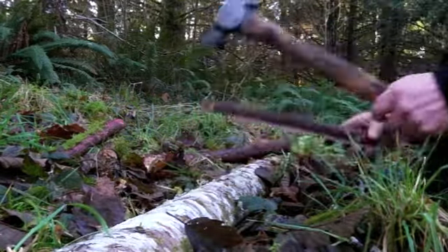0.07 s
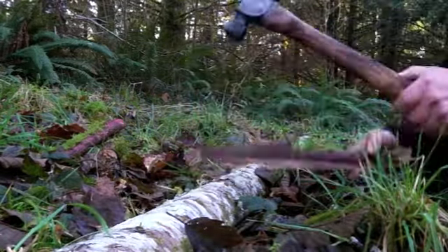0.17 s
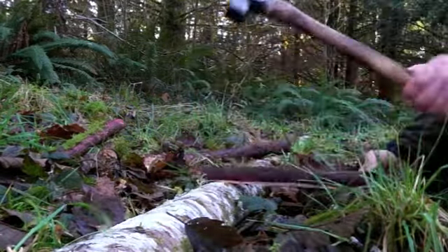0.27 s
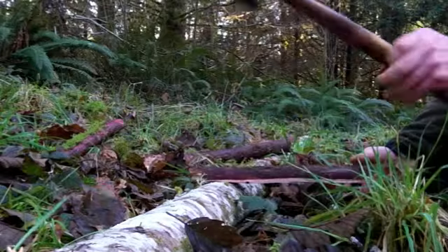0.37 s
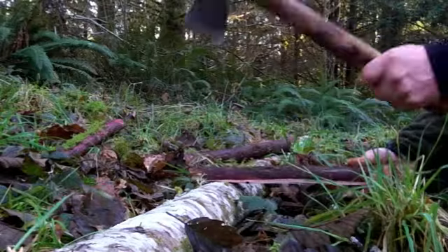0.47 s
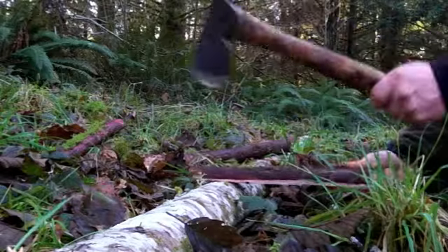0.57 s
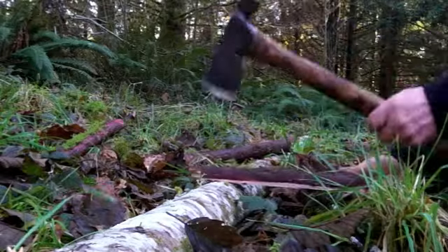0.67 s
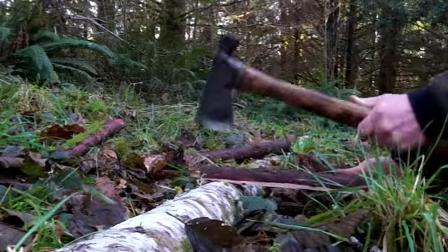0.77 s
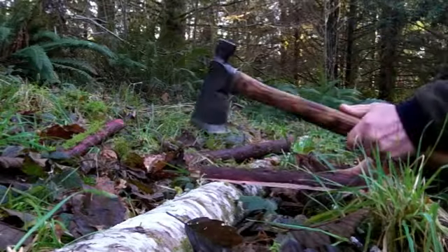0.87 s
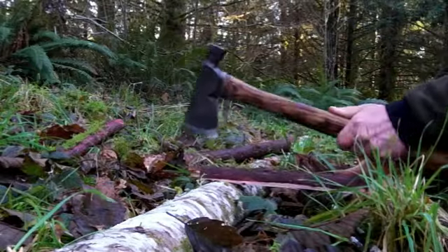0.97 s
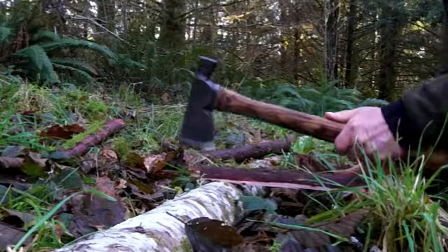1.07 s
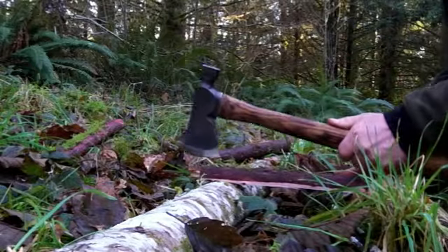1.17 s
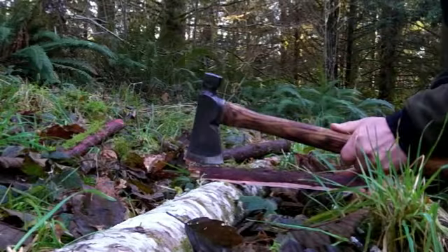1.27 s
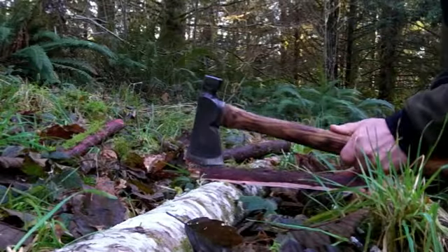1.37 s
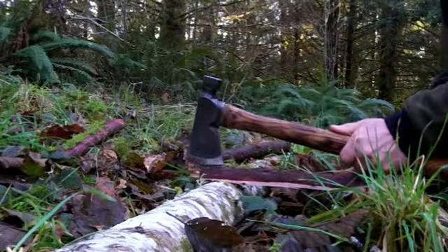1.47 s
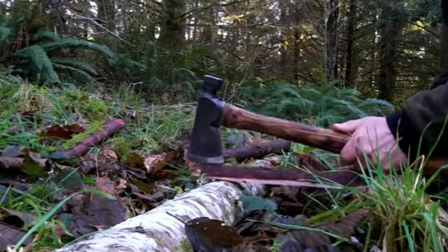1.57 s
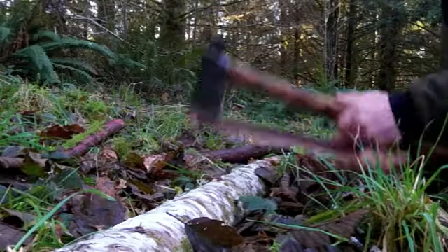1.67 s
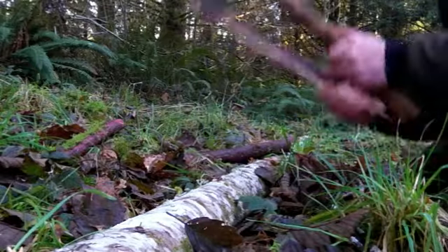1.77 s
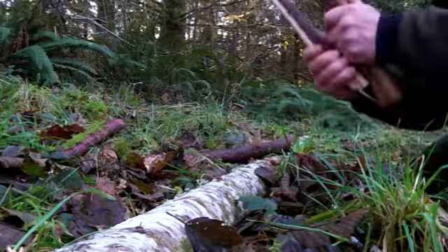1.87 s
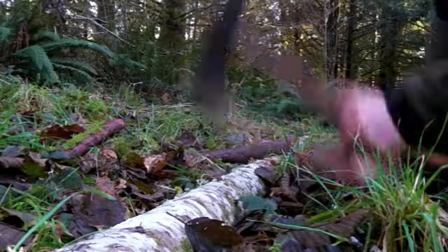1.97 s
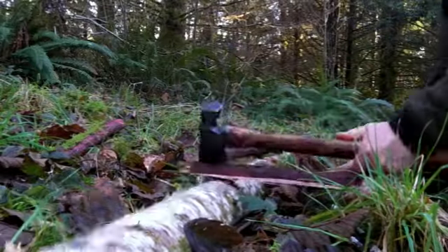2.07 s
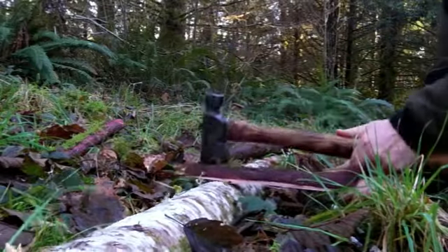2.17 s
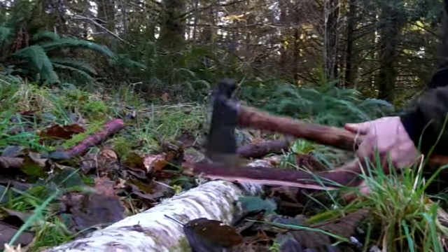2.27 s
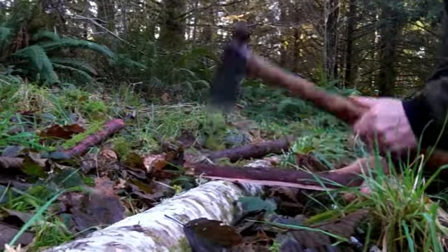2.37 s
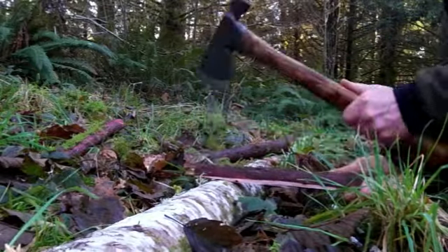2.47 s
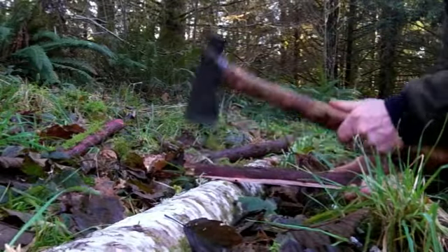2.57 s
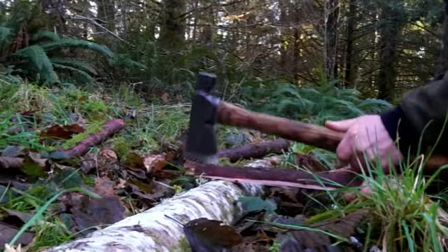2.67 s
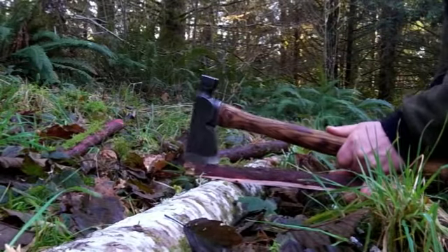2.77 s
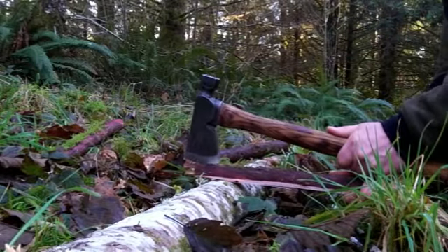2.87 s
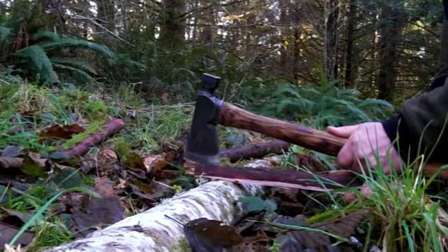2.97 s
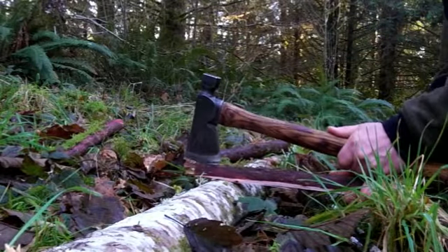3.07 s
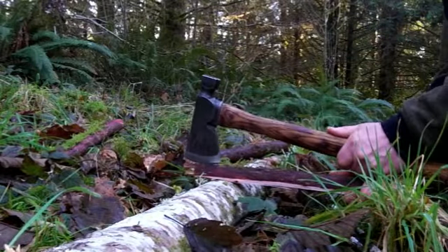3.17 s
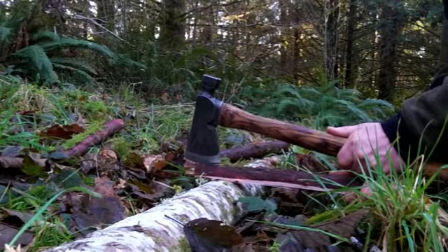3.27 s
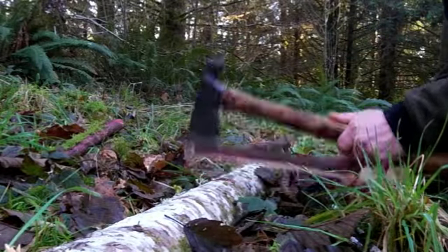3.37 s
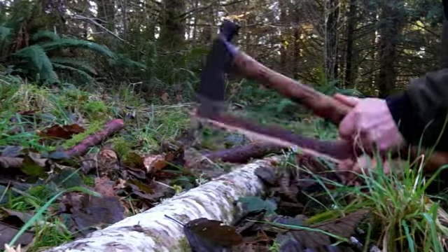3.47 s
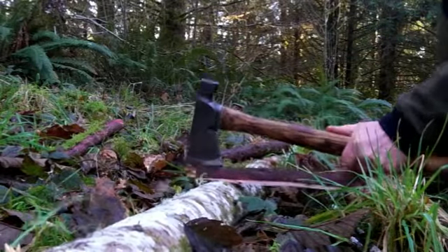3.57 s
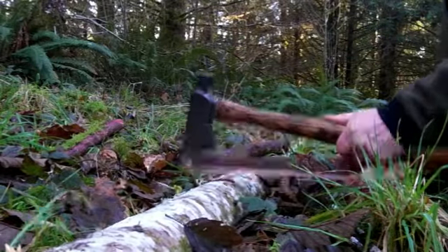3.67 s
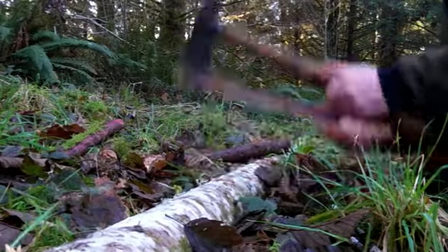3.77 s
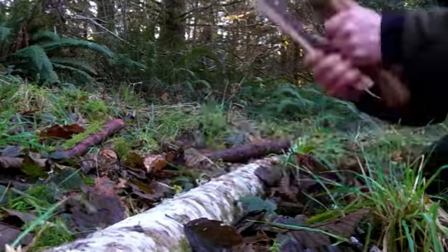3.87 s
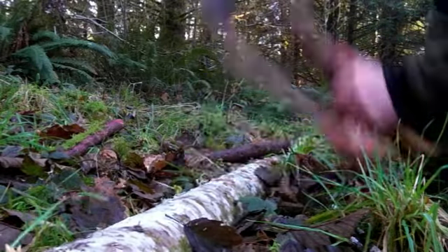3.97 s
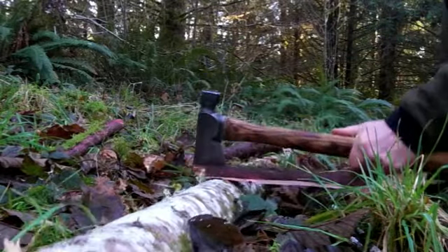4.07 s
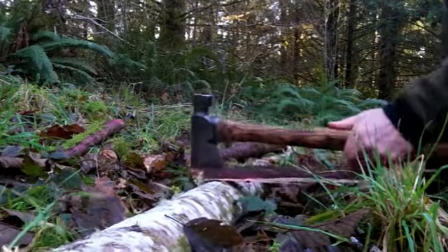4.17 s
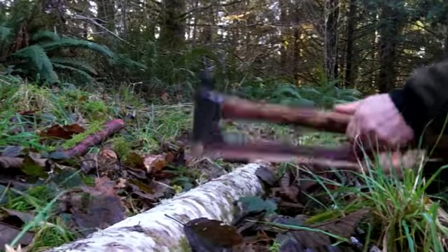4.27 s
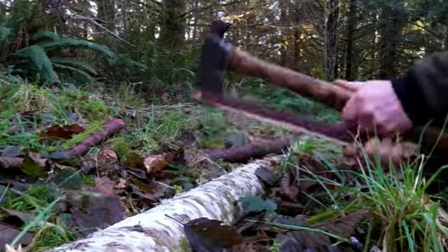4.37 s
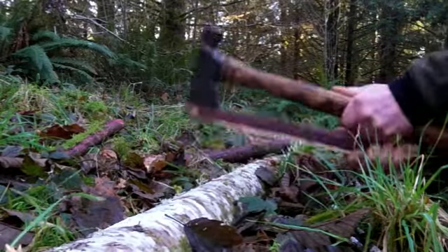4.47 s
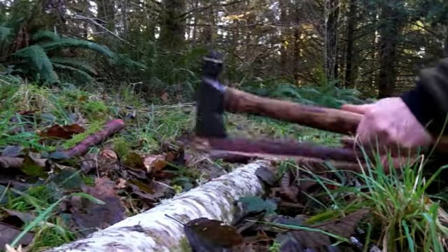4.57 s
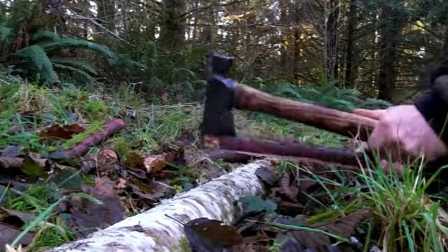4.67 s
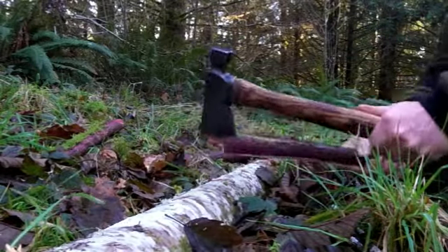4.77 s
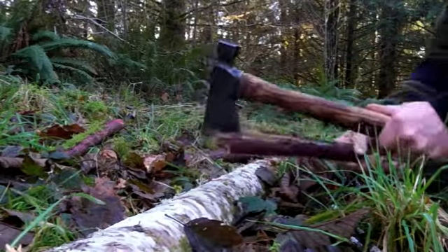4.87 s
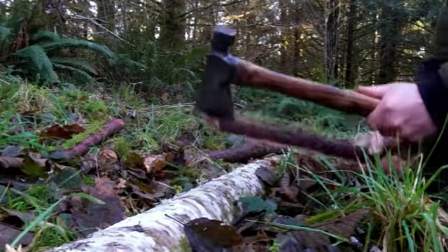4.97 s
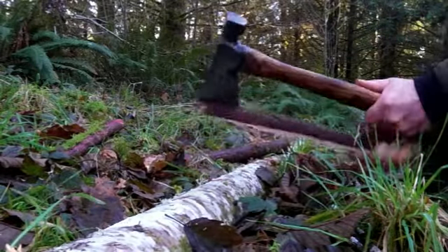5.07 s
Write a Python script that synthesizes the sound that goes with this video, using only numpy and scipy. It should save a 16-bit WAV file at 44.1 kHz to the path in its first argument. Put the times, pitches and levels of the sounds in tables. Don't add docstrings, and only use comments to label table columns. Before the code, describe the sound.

A light hollow knock comes first, then nearly two quiet seconds of faint rustle and air. Three strong wooden blows follow, sharp on top and thudding into soft soil, with small rebounds of the log. Finally the stick is levered apart with brittle snaps and short creaks. Small close microphone, slightly clipped and hissy, open woodland.

```python
import sys
import numpy as np
from scipy import signal
from scipy.fft import rfft, irfft, next_fast_len
from scipy.io import wavfile
from scipy.ndimage import uniform_filter1d, map_coordinates

SR = 44100
rng = np.random.default_rng(int(sys.argv[2]) if len(sys.argv) > 2 else 0)


def invert_db(x):
    u = np.asarray(x, float) / 20
    return 10 ** u


def master_out(mix):
    frames = np.transpose(np.atleast_2d(mix))
    ceiling = np.clip(frames, -1, 1)
    pcm = np.round(ceiling * 32767).astype(np.int16)
    wavfile.write(sys.argv[1], SR, pcm)


N = 224950
TIME = np.arange(N) / SR


def unit(x):
    return x / np.sqrt(np.mean(x ** 2) + 1e-20)


def wobble(rate):
    return map_coordinates(rng.standard_normal(int(N * rate / SR) + 4), [TIME * rate])


def filtered(x, response):
    m = next_fast_len(len(x) + 8192)
    return irfft(rfft(x, m) * response(np.fft.rfftfreq(m, 1 / SR)), m)[:len(x)]


def noise(spectrum):
    f, db = np.transpose(spectrum)

    def colour(hz):
        return invert_db(np.interp(np.log(hz + 1), np.log(f), db, -120, -120))
    return unit(filtered(rng.standard_normal(N), colour))


def ring(t, hz, db, t60, rise):
    t = np.maximum(t, 0)
    return invert_db(db - 60 * t / t60) * (1 - np.exp(-t / rise)) * np.sin(2 * np.pi * hz * t)


def resonance(f, hz, width):
    return 1j * f * width / (hz * hz - f * f + 1j * f * width)


def add(track, s, sound):
    part = track[round(s * SR):][:len(sound)]
    part += sound[:len(part)]


def swells(rows, attack, release):
    gain = 0
    for s, hold, db in rows:
        outside = np.maximum((s - TIME) / attack, (TIME - s - hold) / release)
        gain = gain + invert_db(db - 20 * np.maximum(0, outside))
    return gain


# start in seconds, splinter noise in dB,
# its brightness in dB per octave, splinter t60 in seconds, ground thud in dB.
BLOWS = [
    (0.2502, -18.5, -10, 0.02, -23),
    (2.0449, -11, 1, 0.026, -29.5),
    (3.5959, -20, -1, 0.029, -18.5),
    (4.0632, -11, 1.5, 0.028, -25.5),
    (4.5576, -23, 12, 0.011, -55),
]
# pitch in Hz, level in dB, t60 in seconds.
LIGHT_KNOCK = [(318, -44, 0.16), (450, -12, 0.091), (595, -19, 0.071), (810, -6.5, 0.012),
               (1064, -13, 0.013), (1352, -26.5, 0.02), (2250, -32.5, 0.028), (3210, -10.5, 0.0024),
               (4100, -25, 0.0022)]
HARD_BLOW = [(101.35, -27.5, .1), (282, -9, .036), (452.7, -14, 0.063), (680, -14, .043),
             (1084, 4.5, 0.0085), (1556, 4.5, .0093), (2160, -26, .01), (2880, -16, .0093),
             (4794, -6.5, .0035)]
DULL_BLOW = [(77.8, -31, 0.33), (133.3, -21.5, 0.064), (227.6, -21, 0.16), (296, -33.5, 0.29),
             (453, -20, 0.097), (606, -23, 0.067), (713, -3, 0.014), (968, 2, 0.011), (1515, 1.5, 0.005),
             (2960, -9, 0.0069)]
DEEP_BLOW = [(73.6, -34, 0.1), (134, -25, 0.056), (239, -20, 0.062), (394, -7.5, 0.023),
             (645, -12.5, 0.024), (1093, 7, 0.0075), (1657, -2, 0.0055), (2070, -1.5, 0.0085),
             (3780, 1, 0.0031)]
SPLIT = [(275, -42.5, 0.057), (674, -57, .009), (2100, -13.5, 0.015), (2700, -22.5, 0.028),
         (4380, 3.5, 0.0037), (4940, -3, 0.009)]
LOAD_S = [0.0022, .0065, 0.00598, .0105, 0.00025]


def blows():
    bend_hz, first_s, rise_cycles = 552.7, 0.00034, 0.4
    out, t = np.zeros(N), np.arange(SR // 3) / SR
    contacts = [LIGHT_KNOCK, HARD_BLOW, DULL_BLOW, DEEP_BLOW, SPLIT]
    for (s, db, slope_db, t60, thud_db), modes, load in zip(BLOWS, contacts, LOAD_S):
        wood = np.zeros(len(t))
        for hz, level, fade in modes:
            delay = first_s + load / (1 + (hz / bend_hz) ** 5)
            wood += ring(t - delay, hz, level, fade, rise_cycles / (hz + 60))
        add(out, s, -wood)
        add(out, s, invert_db(thud_db) * thud(t))
        add(out, s, invert_db(db) * splinter(t, slope_db, t60))
        add(out, s, invert_db(db - 42.5) * splinter(t, -13, 0.047))
    return out


def splinter(t, slope_db, t60):
    out = np.zeros(len(t))
    for hz in 700 * 2 ** np.arange(5):
        band = filtered(rng.standard_normal(len(t)), lambda f: np.exp(-(np.log2((f + 1) / hz) / 0.8) ** 2))
        octave = np.log2(hz / 1400)
        band_t60 = t60 * (hz / 1400) ** -0.25
        out += unit(band) * invert_db(slope_db * octave - 0.34 * octave ** 2 - 60 * t / band_t60)
    clumps = np.repeat(rng.standard_normal(len(t) // 64 + 1), 64)[:len(t)]
    return out * invert_db(4.1 * clumps) * (1 - np.exp(-t / 0.0017))


def thud(t):
    low = filtered(rng.standard_normal(len(t)), lambda f: resonance(f, 330, 343) ** 2)
    return unit(low) * invert_db(-60 * t / 0.09) * (1 - np.exp(-t / 0.011))


# start in seconds, peak in dB, tick in dB.
REBOUNDS = [
    (0.14, -51, 11),
    (0.319, -31, 0.5),
    (0.434, -49.5, 8.5),
    (1.35, -53, -13),
    (2.168, -36, -11),
    (2.196, -42, 1),
    (2.331, -27.5, -5.5),
    (3.701, -37.5, -3),
    (3.766, -53, 8),
    (4.197, -37, -7),
]
# pitch in Hz, level in dB, t60 in seconds.
LOG = [(112, 6, 0.052), (245, 4, 0.067), (292, 9, 0.066), (432.3, 10.5, 0.076), (602, -4.5, 0.081),
       (970, -12, 0.014)]


def rebounds():
    out, t = np.zeros(N), np.arange(SR // 5) / SR
    for s, db, tick_db in REBOUNDS:
        for hz, level, t60 in LOG:
            add(out, s, ring(t, hz, db - 9 + level + rng.normal(0, 1.0), t60, 0.0032))
        add(out, s, invert_db(db + tick_db - 8.5) * splinter(t, -15.5, 0.0064))
    return out


# pitch in Hz, width in Hz, level in dB.
STICK = [(1940, 380, -8.5), (2830, 790, 8), (4100, 1100, 11.5), (5250, 1400, 16.5), (6130, 164.6, -10),
         (7470, 290, -45)]


def stick(f):
    return sum((-1) ** k * invert_db(db) * resonance(f, hz, width) for k, (hz, width, db) in enumerate(STICK))


# start in seconds, peak in dB.
FIBRES = [(4.545, -27.5), (4.5507, -30), (4.5669, -23), (4.5776, -19), (4.5839, -26), (4.588, -16.5),
          (4.5964, -24), (4.6063, -20.5), (4.659, -13), (4.7363, -11), (4.7514, -35.5), (4.7737, -27),
          (4.7767, -26), (4.7911, -28), (4.7976, -33), (4.8222, -25), (4.8289, -23), (4.8513, -21),
          (4.8546, -30), (4.8671, -15), (4.8842, -25), (4.886, -30)]
# start in seconds, peak in dB, pitch in Hz.
TWIGS = [(.317, -42, 1460), (.405, -36, 1400), (.4511, -30.5, 3180), (.487, -44, 2200), (1.0404, -46, 1020),
         (2.0486, -15.5, 3200), (2.063, -34, 4300), (2.071, -44.5, 3230), (2.265, -37, 3050),
         (2.276, -39, 3600), (2.2822, -34, 3140), (2.2877, -35.5, 2600), (2.3312, -29.5, 2430),
         (3.5965, -13.5, 4130), (3.6048, -29.5, 2380), (3.616, -31.5, 2530), (4.0636, -11, 4560),
         (4.069, -22, 2600), (4.0735, -33, 4200), (4.1454, -42.5, 1580), (4.198, -39.5, 880),
         (4.2273, -23, 2130), (4.227, -16, 4880), (4.2305, -25.5, 3500), (4.2567, -20.5, 3750),
         (4.2644, -29.5, 3400), (4.6404, -30.5, 3270), (4.6623, -16.5, 2700), (5.0785, -24.5, 2460),
         (5.087, -35, 2470)]


def snaps():
    fibre_hz, fibre_spread, t60 = 4840, 0.068, 0.01
    out, t = np.zeros(N), np.arange(SR // 20) / SR
    fibres = [(s, db, fibre_hz * np.exp(fibre_spread * rng.standard_normal())) for s, db in FIBRES]
    for s, db, hz in TWIGS + fibres:
        crack = invert_db(-60 * t / t60) * (1 - np.exp(-t / 0.0001)) * rng.standard_normal(len(t))
        crack[3] += 3.5
        stick_gain = invert_db(-17.5 + 10 * np.log2(hz / 4500))
        snap = filtered(crack, lambda f: resonance(f, hz, 0.39 * hz) ** 2 + stick_gain * stick(f))
        snap = snap + ring(t, hz, -7.5, t60, 0.0002)
        add(out, s + 0.0005, invert_db(db) * snap / np.abs(snap).max())
    return out


def chip():
    return ring(TIME - 0.455, hz=3570, db=-50, t60=0.14, rise=0.0028)


# start in seconds, hold in seconds, level in dB.
TEAR = [
    (4.549, 0.04, -39.5),
    (4.615, 0.031, -40),
    (4.67, 0.0016, -42),
    (4.742, 0.021, -39.5),
    (4.805, 0.0076, -47.5),
    (4.833, .003, -45),
    (4.855, 0.0018, -26.5),
    (4.89, 0.015, -52),
]


def tearing():
    breaks = (rng.random(N) < 1600 / SR) * rng.standard_normal(N)
    breaks = breaks * invert_db(3 * rng.exponential(size=N).clip(0, 3))
    grain = unit(filtered(breaks * invert_db(3 * wobble(150)), stick))
    return swells(TEAR, attack=0.026, release=0.031) * grain


# start in seconds, hold in seconds, level in dB.
CREAK = [
    (4.94, 0.025, -53),
    (5.078, .03, -52.5),
]
# frequency in Hz, level in dB per Hz.
STRAIN = [(1500, -36.5), (2100, -15.5), (2650, -3), (3200, -17), (3800, -5), (4500, -37)]


def creaking():
    return swells(CREAK, attack=0.032, release=0.03) * invert_db(1.1 * wobble(56)) * noise(STRAIN)


# start in seconds, hold in seconds, level in dB.
STIR = [
    (0, 0.41, -61.5),
    (.65, 0.22, -61.5),
    (1.85, 0.56, -66),
    (3.7, 0.48, -70.5),
    (4.3, .1, -65),
    (4.74, .15, -65.5),
]
# frequency in Hz, level in dB per Hz.
RUSTLE = [(250, -20), (700, -5), (1500, -1), (3000, 0), (5000, -12), (7000, -20.5), (9000, -65.5)]


def leaves():
    return (invert_db(-67) + swells(STIR, attack=0.23, release=0.26)) * invert_db(1.5 * wobble(30)) * noise(RUSTLE)


# start in seconds, hold in seconds, level in dB.
SETTLE = [
    (2.24, 0.055, -54),
    (3.73, 0.013, -59),
    (4.2, 0.029, -50),
    (4.27, 0.046, -53),
]
# frequency in Hz, level in dB per Hz.
LITTER = [(150, -18.5), (350, -0.5), (900, -4), (2000, -6), (3500, -14), (5000, -18)]


def settling():
    return swells(SETTLE, attack=0.06, release=0.16) * invert_db(3.2 * wobble(60)) * noise(LITTER)


# start in seconds, hold in seconds, level in dB.
SHAKE = [
    (.27, .02, -52),
    (1.35, 0.055, -57.5),
    (2.12, 0.059, -43),
    (3.64, 0.058, -51.5),
    (4.2, 0.03, -43),
]
# frequency in Hz, level in dB per Hz.
RUMBLE = [(20, -28), (40, -.5), (110, -7.5), (250, -17.5), (600, -38.5)]


def ground():
    effort = invert_db(-68) + swells(SHAKE, attack=0.15, release=0.23)
    return effort * invert_db(-10.0 + 1.2 * wobble(36)) * noise(RUMBLE)


# frequency in Hz, level in dB per Hz.
AIR = [(15, -27.5), (25, 0), (460, -6), (900, -9.5), (5600, -14), (6900, -17.5), (7800, -29.5), (8400, -77)]


def forest_air():
    return invert_db(-57 - 1.0 + 0.6 * wobble(2.2)) * noise(AIR)


def microphone(f):
    u = 1j * f / 5960
    roll_off = (1 / ((u * u + 1.16 * u + 1) * (u * u + 1.38 * u + 1))) ** 2
    shelf = invert_db(-30.5) / (1 + (f / 15000) ** 8)
    return (roll_off + shelf) * (1j * f / (45 + 1j * f)) ** 2


def scene():
    near = blows() + rebounds() + snaps() + chip() + tearing() + creaking()
    forest = leaves() + settling() + ground() + forest_air()
    return (filtered(near, microphone) + forest)[None]


# start in seconds, depth in dB, recovery in seconds.
DUCK = [
    (2.051, -20, 0.13),
    (3.6, -14, 0.096),
    (4.069, -26, 0.13),
]
# frequency in Hz, level in dB per Hz.
HISS = [(7600, -61), (8200, -11.5), (8700, 0), (11750, 2.5), (11850, -25), (11950, -0.5), (14800, 4.5),
        (15500, -34.5)]


def hiss(x):
    duck_db = 0
    for s, db, back in DUCK:
        duck_db = duck_db + db * (TIME > s) / (1 + np.exp((TIME - s - back) / (0.2 * back)))
    below = filtered(x, lambda f: (f > 3500) & (f < 7000))
    follow = np.sqrt(np.abs(uniform_filter1d(below ** 2, size=100)))
    return np.hypot(invert_db(-64.5 + duck_db), invert_db(-23.5) * follow) * noise(HISS)


# centre in seconds, half length in seconds, lowest frequency
# touched in Hz, bar over the mean in dB.
STARVED = [(.275, .014, 13500, 6), (.937, .011, 1000, 1.5), (1.195, .012, 600, 1.5), (1.535, .011, 1500, 1),
           (1.81, .011, 2500, 0), (2.12, .09, 13800, 6), (2.49, .011, 1500, 1.5), (2.964, .03, 150, 3),
           (3.05, .011, 300, 1.5), (3.435, .011, 3000, 1), (3.63, .04, 14300, 6), (4.15, .09, 14300, 6),
           (4.245, .02, 7000, 0), (4.308, .008, 4300, 3), (4.415, .012, 1500, 1.5)]


def starve(x):
    hz, t, z = signal.stft(x, SR, nperseg=1024, noverlap=768)
    size = uniform_filter1d(uniform_filter1d(np.abs(z), size=4, axis=0), size=5, axis=1)
    mean = uniform_filter1d(uniform_filter1d(size, size=41, axis=0), size=15, axis=1)
    bar = 0
    for s, half, low, db in STARVED:
        bar = bar + invert_db(db) * np.outer(hz > low, np.clip(3 - 3 * ((t - s) / half) ** 2, 0, 1))
    bar = bar * invert_db(2.5 * (hz[:, None] > 7000)) * mean
    kept = (size / (bar + 1e-12)).clip(0, 1) ** 8
    return signal.istft(z * kept, SR, nperseg=1024, noverlap=768)[1][:N]


def low_pass(x):
    return signal.sosfilt(signal.butter(12, 16430, fs=SR, output="sos"), x)


def record(dry):
    x = dry[0] / (1 + np.abs(dry[0]) ** 8) ** (1 / 8)
    mix = starve(x + hiss(x))[None]
    return low_pass(mix)


dry = scene()
out = record(dry)
master_out(out)
```